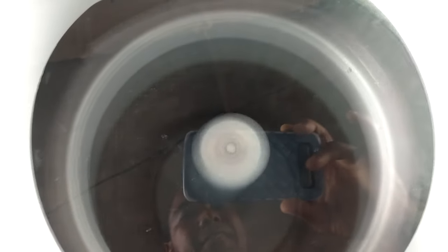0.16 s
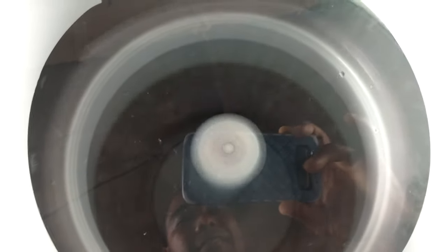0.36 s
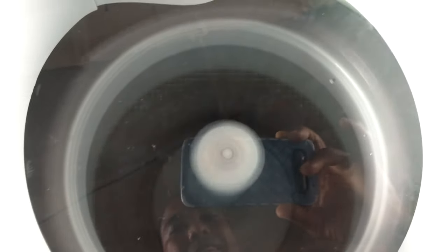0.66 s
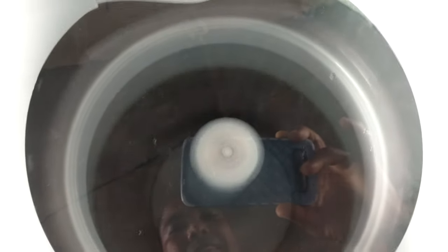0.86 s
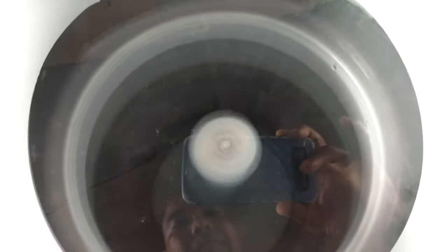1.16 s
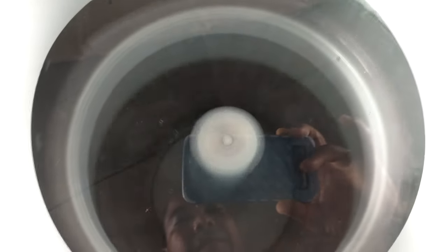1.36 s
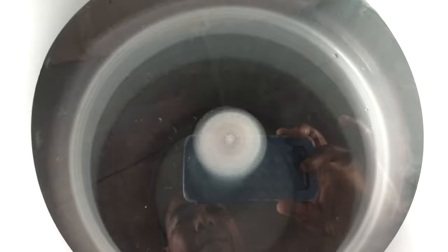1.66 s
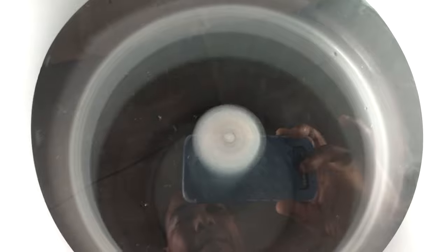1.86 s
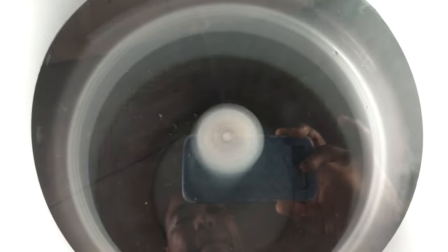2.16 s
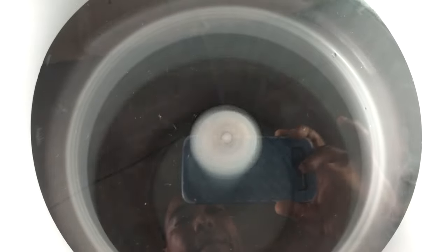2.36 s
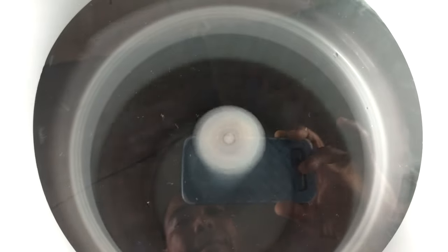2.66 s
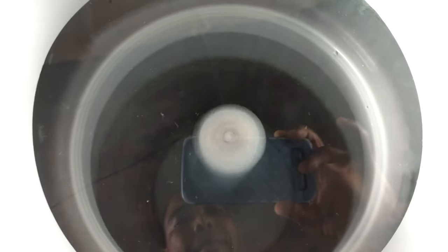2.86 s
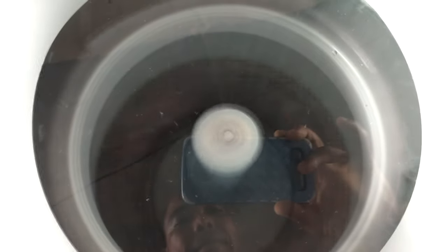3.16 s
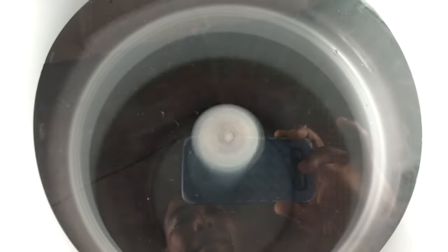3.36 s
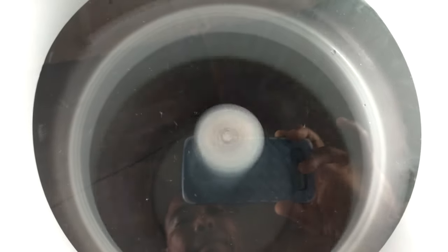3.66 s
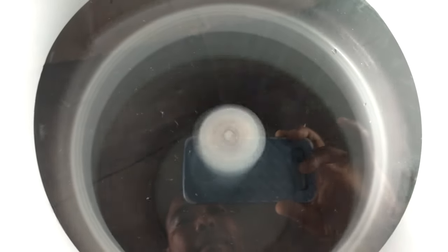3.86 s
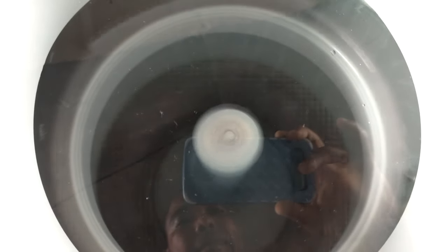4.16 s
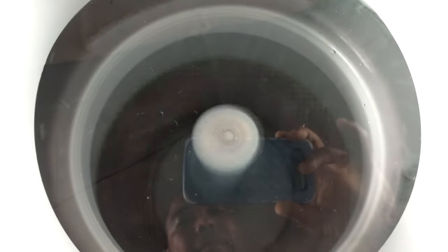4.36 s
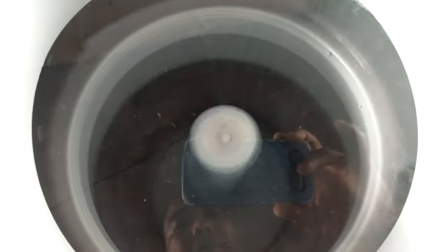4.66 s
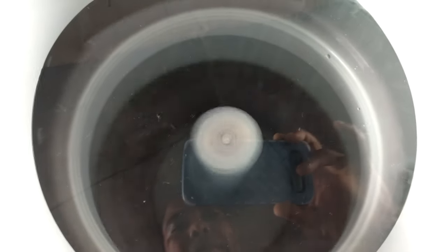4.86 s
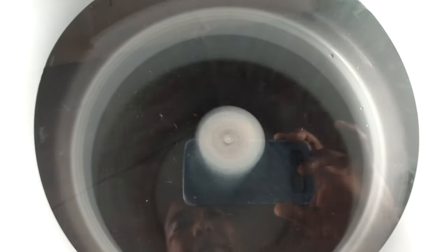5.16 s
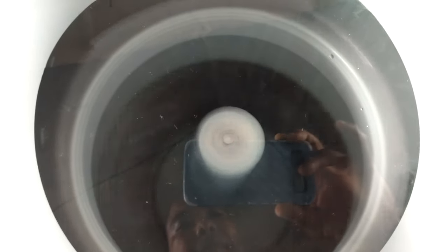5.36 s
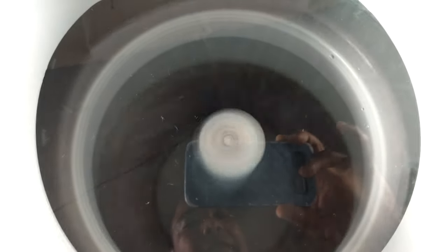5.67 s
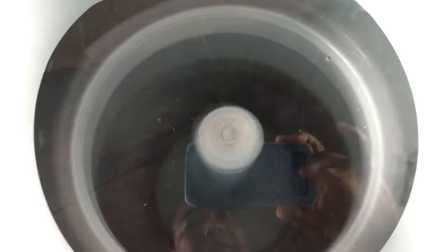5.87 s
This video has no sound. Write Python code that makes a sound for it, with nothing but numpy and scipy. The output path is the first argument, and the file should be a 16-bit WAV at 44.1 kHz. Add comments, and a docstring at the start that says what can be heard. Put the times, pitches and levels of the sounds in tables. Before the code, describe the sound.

In a hard-walled room, a washing machine drum is coasting, heard close up. At 0 s a short rattling jolt and bright fizz settle at once into faint low rumble, airy hiss and 120 Hz hum. Soft hollow knocks follow about twelve a second, strongest near 0.6 s, thinning after 1.1 s and gone by 1.7 s; thin bearing squeaks and tiny crackles on the right accompany them, the squeaks lasting until about 2.2 s. Distant small birds chirp: high falling peeps roughly every half second from 0.3 s, plus quick warbled phrases near 0.35, 1, 1.6, 2.3, 3.5 and 4.8 s. A dry broom-like swish runs 2.8-3.2 s, a shorter one at 4.1-4.4 s, then several quick strokes at 5-5.6 s. At 5.7 s a loud panel-ringing clunk with a thud starts the motor, a weaker rebound follows, and beating tones around 600-750 Hz growl until 6 s.

```python
"""In a hard-walled room a washing machine drum coasts: shaped noise makes rumble, rattle and hiss over mains hum.
Puffs of noise in the drum's modes knock about once a turn, thinning out, among faint squeaks and crackle.
Small birds chirp some way off as gliding sines in a room tail; resonant noise swishes like a broom.
At the end the motor starts: decaying sines and a noise thud clunk, then pairs of wavering tones growl."""
import sys
import numpy as np
from scipy import signal
from scipy.fft import rfft, irfft, next_fast_len
from scipy.io import wavfile
from scipy.ndimage import uniform_filter1d, map_coordinates

SR = 44100
rng = np.random.default_rng(int(sys.argv[2]) if len(sys.argv) > 2 else 0)


def transcribe(signal):
    """Save signal, clipped to [-1, 1], as a 16-bit WAV file at the path in sys.argv[1]."""
    frames = np.atleast_2d(signal).T
    limited = np.clip(frames, -1, 1)
    pcm = np.round(limited * 32767).astype(np.int16)
    wavfile.write(sys.argv[1], SR, pcm)


N = 265614
TIME = np.arange(N) / SR  # seconds

# All levels in the tables are relative; the functions may add make-up gain.
# Stereo likeness of the diffuse noises: pitch_hz, left_right_likeness (1 alike, 0 unrelated, -1 opposed)
ALIKE = [(60, 0.74), (180, 0.93), (550, 0.81), (1650, -0.13), (4970, 0.14), (15000, -0.33)]
# Decay of the room by band: pitch_hz, t60_s
ROOM = [(300, 0.27), (2000, 0.26), (5000, 0.26), (12000, 0.4)]

# Mains hum: pitch_hz, level_db
HUM = (120, -62)
# Low drone under the hum: start_s, level_db
DRONE = [(0, -77), (.9, -75.5), (1.4, -80.5), (2.2, -80), (3.5, -75), (6.02, -77.5)]
# Noise colour of the cabinet's rumble: pitch_hz, level_db (per Hz)
CABINET = [(25, -37), (45, -46), (100, -38), (160, -15.5), (200, -9), (240, -8.5), (280, -15), (322, -1),
           (370, -7.5), (450, -20), (600, -51), (2000, -120)]
# Noise colour of the rattle: pitch_hz, level_db (per Hz)
RATTLE = [(250, -20), (420, -7), (516, -2), (606, -10.5), (767, -5), (901, -11), (1050, -10.5), (1350, -19),
          (1570, -14.5), (2600, -29.5), (3380, -47), (5720, -120)]
# Noise colour of the hiss: pitch_hz, level_db (per Hz)
HISS = [(600, -60), (1200, -15), (2000, -9), (2600, -13), (3800, -11), (5000, -16), (6700, -18), (9400, -7),
        (12500, -14), (13100, -60)]
# Base levels as the drum slows: (dB at the start, dB per second)
CABINET_DB, RATTLE_DB, HISS_DB = (-61.5, -0.66), (-66.5, -0.62), (-74.5, -0.55)
JOLT_DB, JOLT_S = 17.5, 0.051  # extra rattle at the start and its settling time constant
DRIVEN_DB_PER_S = 19.5  # cabinet and rattle swell once the motor pulls
# Squeaks of a bearing: peak_s, level_db
SQUEAKS = [(.04, -68.5), (.31, -75), (.49, -80), (0.649, -63), (.89, -65.5), (1.36, -70.5), (1.61, -68),
           (1.812, -76), (2.14, -65.5), (2.23, -71.5)]
SQUEAK_RISE_DB_PER_S, SQUEAK_FALL_DB_PER_S = 600, 106

# Brief high sounds: peak_s, rise_s, fall_s (time constants), centre_hz, width_hz (of one pass), level_db
GLINTS = [(0, .01, 0.038, 10260, 2190, -49), (.65, .04, .06, 14300, 350, -74)]

# Drum knocks, about one a turn: start_s, low_mode_db, middle_over_low_db, upper_over_low_db
KNOCKS = [(0.009, -55.5, 8, 6), (0.07, -53.5, 5, 5.5), (0.15, -57.5, -1, 8), (0.229, -48, -21, -8),
          (0.31, -59, -7, -12), (0.399, -54.5, 0, -5.5), (0.471, -58, 1, -1), (0.553, -53, -5.5, -2.5),
          (0.63, -42, -9, -7.5), (0.688, -57.5, 6.5, -8), (0.715, -57.5, 4, -5), (0.748, -56.5, 3, -21),
          (0.796, -50, -4.5, -16), (0.878, -48, -14, -8), (0.964, -49, -15, -4), (1.043, -48, -11, -9.5),
          (1.126, -49.5, -1, -18), (1.211, -61, -14, -12), (1.294, -59.5, -12, 1.5), (1.374, -62, -9, -13),
          (1.46, -49.5, -15, -19), (1.63, -60, -11, -13)]
# Low, middle and upper drum mode: pitch_hz, width_hz (of one pass), level_db
DRUM = [(323, 41, -0.5), (542, 122, 2.5), (1040, 110, 2.5)]

# First bird's falling note: length_s, start_hz, end_hz
PEEP = (0.0349, 7200, 6580)
# When the first bird peeps: start_s, level_db
PEEPS = [(0.329, -56.5), (0.826, -53.5), (0.947, -66.5), (1.399, -57), (1.861, -56.5), (2.362, -56),
         (2.863, -53.5), (3.401, -56), (3.898, -55.5), (4.424, -55.5), (4.999, -55), (5.49, -53)]
# A quick drop after some peeps: start_s, start_hz, end_hz, level_db
ZIPS = [(0.878, 7860, 3800, -53.5), (1.923, 5800, 3240, -61.5), (2.44, 7350, 5300, -55.5)]
ZIP_S = 0.0083
# Second bird's phrase: pickup, low rise, high rise, fall, dip, held note, low ending;
# after_s (from the start of the rise), length_s, start_hz, end_hz (None is the phrase's peak pitch)
PHRASE = [(-.016, .022, 6350, 6350), (0, .015, 3950, 4640), (.006, 0.015, 4850, None),
          (0.017, 0.032, None, 3300), (.04, .028, 3500, 3580), (.07, .026, 3780, 3983),
          (.1, .024, 3080, 3080)]
# When the second bird sings: start_s, peak_hz, then level_db of each of the seven notes
PHRASES = [(.349, 5505, -72, -53, -51.5, -58, -53, -47, -74),
           (.973, 4596, -89, -48.5, -61, -50, -65, -77, -83),
           (1.608, 5390, -69, -55, -53.5, -77, -56.5, -46, -76),
           (2.328, 5200, -85, -87, -80, -60, -59, -68, -66),
           (3.496, 5490, -59, -51, -52.5, -63, -58.5, -51.5, -68),
           (4.838, 5710, -67.5, -61, -58, -57, -60, -52, -65.5)]
# Single short notes: start_s, pitch_hz (centre of the glide), level_db
CHIPS = [(0.205, 4800, -72.5), (.33, 7830, -66), (.69, 5000, -76.5), (1.045, 3100, -66),
         (1.79, 5260, -63.5), (2.276, 2520, -71), (2.977, 4050, -48.5), (3.336, 1530, -72.5),
         (4.452, 2256, -69.5), (5.335, 4030, -47.5), (5.435, 4000, -46.5)]
CHIP_S = 0.023

# One curve a stroke of the swishing: start_s, level_db, treble_over_level_db, rings_over_level_db
SWISHES = [
    [(2.77, -80, -11, 2), (2.795, -60, -16, -6), (2.806, -45.5, -18, -5), (2.876, -53, -22, -8.5),
     (2.908, -50, -11.5, 2.5), (2.986, -47.5, 1, -4.5), (3.106, -47.5, -2.5, 1.5), (3.156, -49, -6, -4.5),
     (3.3, -92, -6, -7)],
    [(4.02, -75, -5, -4), (4.094, -59, 8.5, 1), (4.154, -65, 6.5, -2), (4.2, -65, 2, 2)],
    [(4.14, -77, -2, -16), (4.18, -59.5, 0, 1), (4.21, -49, 0.5, 3.5), (4.276, -46, -5.5, -5.5),
     (4.372, -54, -14, -2.5), (4.41, -59.5, -4, -18), (4.55, -85, -2, -2)],
    [(4.97, -83, -11, -6), (4.998, -60, -9, 0), (5.06, -73.5, -21, -1), (5.096, -63, -26, 5),
     (5.15, -85.5, -16, 8)],
    [(5.15, -68.5, -16, -1), (5.19, -69.5, -17, 5), (5.2, -56.5, -17, -5), (5.235, -51.5, -24, 2),
     (5.252, -54, -27, 1.5), (5.3, -67, -8, -9)],
    [(5.3, -69.5, -24, 3), (5.336, -45.5, -5.5, -10), (5.388, -51, 2, -1.5), (5.44, -46, 7, 3.5),
     (5.526, -55, -3, -7), (5.64, -85, -10, -6)],
]
# Colour of each stroke over its level: upper_group_db, top_treble_db, low_ring_db, middle_ring_db,
# high_ring_db, left_minus_right_db
STROKES = [(-2, -6, -23, -11, -5, -0.82), (-4.5, 8, -25, -24, -16, -1.5), (-3, -5, -8.5, -21.5, -11.5, .5),
           (5, -11, -7, -9.5, -3.5, -0.5), (2.5, -7, -3, -8, 0, 1), (-4, -17, -24, -15, -13.5, -0.5)]
# Resonances of the fine contacts, a lower and an upper group: pitch_hz, width_hz, level_db
BRISTLES = [
    [(3110, 1040, -6), (3820, 860, -2), (4570, 770, -4.5)],
    [(5580, 390, 12.5), (6760, 3600, 2.5)],
]
# Low, middle and high hollow ring: pitch_hz, width_hz, level_db (of one pass, applied twice)
HOLLOW = [
    [(1126, 70, 1)],
    [(1550, 98, -6.5), (2013, 140, 0.5)],
    [(2648, 73, 2)],
]

# The motor's clunk and its rebound: start_s, ring_db, thud_db
CLUNKS = [(5.688, -28, -25.5), (5.785, -44, -57)]
# Panels that ring: pitch_hz, level_db, t60_s
PANELS = [(313, -14, 0.25), (486, -14, 0.23), (642, 6.5, 0.13), (740, 3, 0.2), (763, -9, .15),
          (855, -24, .15), (920, -3.5, 0.12), (1010, -20, 0.098), (1134, 10, 0.053), (1217, -1, 0.099),
          (1800, -14.5, 0.092)]
# Noise colour of the thud: pitch_hz, level_db (per Hz)
THUD = [(150, -54), (250, -17.5), (550, -19.5), (631, -1), (1130, -1.5), (1460, -16), (2300, -18),
        (2800, -30), (3400, -21), (3850, -37), (4300, -27.5), (5600, -44), (8970, -47), (11600, -36),
        (15000, -80)]
# Course of the growl: start_s, growl_db, upper_over_lower_pair_db
MOTOR = [(5.673, -48, -3.5), (5.689, -45.5, 13), (5.742, -44.5, -1.5), (5.8, -45, 3), (5.86, -44.5, 3),
         (5.94, -48, -2), (6.02, -42.5, -12)]
# Lower and upper pair of winding tones: pitch_hz, level_db
WINDINGS = [
    [(601, 0), (646, -7)],
    [(703, 2), (757, -11)],
]

TOP_HZ = 15750  # nothing sounds from here up


def amp(db):
    """Gain of a level in dB."""
    return 10 ** (np.asarray(db) / 20)


def unit(x):
    """x at rms 1."""
    return x / np.sqrt(np.mean(x ** 2) + 1e-20)


def along(points, hz):
    """(Hz, value) points read on a log frequency axis."""
    f, value = np.transpose(points)
    return np.interp(np.log(hz + 1), np.log(f + 1), value)


def wobble(rate):
    """A smooth random curve, rate knots a second."""
    knots = rng.standard_normal(int(N * rate / SR) + 4)
    return map_coordinates(knots, [np.arange(N) * rate / SR])


def filtered(x, response):
    """x shaped by a response that is a function of frequency in Hz."""
    m = next_fast_len(x.shape[-1] + 8192)
    spectrum = rfft(x, m) * response(np.fft.rfftfreq(m, 1 / SR))
    return irfft(spectrum, m)[..., :x.shape[-1]]


def coloured(points):
    """Response drawn through (Hz, dB) points."""
    return lambda hz: amp(along(points, hz))


def resonances(modes):
    """Response of (Hz, width, dB) resonances side by side, with alternating signs."""
    def response(f):
        total = 0
        for k, (centre, width, db) in enumerate(modes):
            peak = 1j * f * width / (centre * centre - f * f + 1j * f * width)
            total = total + (-1) ** k * amp(db) * peak
        return total
    return response


def twice(modes):
    """Resonances applied twice, for steep skirts."""
    return lambda hz: resonances(modes)(hz) ** 2


def band(lo, hi):
    """Smooth band-pass response from lo to hi Hz with steep edges."""
    return lambda hz: 1 / np.sqrt((1 + (lo / (hz + 1)) ** 12) * (1 + (hz / hi) ** 12))


def diffuse(gain):
    """Stereo noise of rms 1; the share of mid and side sets how alike left and right are by frequency."""
    def mid_side(hz):
        turn = np.arccos(np.clip(along(ALIKE, hz), -1, 1)) / 2
        return gain(hz) * [np.cos(turn), np.sin(turn)]
    mid, side = filtered(rng.standard_normal((2, N)), mid_side)
    return unit(np.array([mid + side, mid - side]))


def patches(x, patchy_db):
    """Random gain in patches of time and frequency."""
    z = signal.stft(x, nperseg=256)[2]
    field = uniform_filter1d(rng.standard_normal(z.shape), size=3, axis=1)
    field = uniform_filter1d(field, size=8, axis=2)
    gain = amp(patchy_db * unit(field) - patchy_db ** 2 / 9)
    return signal.istft(z * gain, nperseg=256)[1][:, :N]


def in_room(x, direct_db, rise, lumpy_db):
    """Direct sound plus a fresh random tail that builds up and dies by band, with lumps of echo."""
    hz, t, z = signal.stft(rng.standard_normal((2, SR // 2)), SR, nperseg=256)
    echoes = uniform_filter1d(rng.standard_normal(z.shape), size=5, axis=1)
    decay_db = -60 * t / along(ROOM, hz)[:, None]
    tail = signal.istft(z * amp(lumpy_db * unit(echoes) + decay_db), SR, nperseg=256)[1]
    tail = tail * (1 - np.exp(-np.arange(tail.shape[1]) / SR / rise))
    tail = tail / np.linalg.norm(tail[0])
    tail[:, 0] = amp(direct_db)
    return signal.fftconvolve(x[None], tail, axes=1)


def add(track, s, x):
    """Mixes x into track from time s on."""
    part = track[:, round(s * SR):][:, :x.shape[-1]]
    part += x[..., :part.shape[1]]


def hum_and_drone():
    """Mains hum is one slightly wavering sine; the drone is noise through a low resonance."""
    hz, db = HUM
    hum = amp(db + 1 + 0.41 * wobble(2)) * np.sin(2 * np.pi * hz * TIME)
    drone_db = np.interp(TIME, *np.transpose(DRONE)) + 6.0
    return hum + amp(drone_db) * diffuse(twice([(83.0, 63, 0)]))


def cabinet_and_rattle():
    """Rumble and rattle are unsteady noise that fades as the drum slows and swells as the motor pulls."""
    cabinet_db, rattle_db = [db + slope * TIME for db, slope in (CABINET_DB, RATTLE_DB)]
    driven_db = DRIVEN_DB_PER_S * np.clip(TIME - MOTOR[0][0], 0, None)
    cabinet = amp(cabinet_db + driven_db + 0.6 * wobble(21)) * diffuse(coloured(CABINET))
    jolt_db = JOLT_DB * np.exp(-TIME / JOLT_S)
    rattle = amp(rattle_db + driven_db + jolt_db + 2.1 * wobble(30)) * diffuse(coloured(RATTLE))
    return cabinet + rattle


def squeaks():
    """A bearing squeaks: narrow noise that rises fast and falls more slowly, with a shaky level."""
    swell = 0
    for s, db in SQUEAKS:
        drop_db = np.maximum(SQUEAK_RISE_DB_PER_S * (s - TIME), SQUEAK_FALL_DB_PER_S * (TIME - s))
        swell = swell + amp(db - drop_db)
    return swell * amp(1.7 * wobble(30.03)) * diffuse(twice([(1822, 81, 0)]))


def hiss():
    """Faintly patchy broad noise that fades as the drum slows."""
    db, slope = HISS_DB
    return patches(amp(db + slope * TIME) * diffuse(coloured(HISS)), patchy_db=0.5)


def glints():
    """A bright fizz dying away at the start and a thin high whine, both resonant noise."""
    out = 0
    for s, rise, fall, hz, width, db in GLINTS:
        swell = np.exp(-np.maximum((s - TIME) / rise, (TIME - s) / fall))
        out = out + amp(db) * swell * diffuse(twice([(hz, width, 0)]))
    return out


def ticks(count=260):
    """Faint high crackle in the first second, on the right: tiny wavering sines that swell and die fast."""
    out, t = np.zeros((2, N)), np.arange(SR // 16) / SR
    for when, pitch, size, pan in rng.random((count, 4)):
        wavering = np.cumsum(rng.normal(0, 0.089, len(t)))
        tone = np.sin(2 * np.pi * (7500 + 7000 * pitch) * t + wavering)
        ring = amp(-60 * t / 0.035) * tone * (1 - np.exp(-t / 0.0055))
        size_db = -5.3 * np.log(1 - .97 * size)  # a few ticks stand out
        pan_db = np.array([[6], [-6]]) * (pan - 2.67)
        add(out, when ** 1.1, amp(-82 + size_db + pan_db) * ring)
    return out


def knocks():
    """About once a turn the drum brushes its tub: a short puff of contact noise in each mode."""
    out, t = np.zeros((2, N)), np.arange(SR // 8) / SR
    puff = t / .004 * np.exp(1 - t / 0.0033)
    for s, db, *over_low in KNOCKS:
        for mode, level in zip(DRUM, [0, *over_low]):
            shared, separate = rng.standard_normal(len(t)), rng.standard_normal((2, len(t)))
            ring = filtered(puff * (shared + 0.57 * separate), twice([mode]))
            add(out, s, amp(db + level + mode[2]) * ring / np.abs(ring).max())
    return out


def bird_notes():
    """Every note of the birds as (start s, length s, start Hz, end Hz, level dB)."""
    notes = [(s, *PEEP, db) for s, db in PEEPS]
    notes += [(s, ZIP_S, *drop) for s, *drop in ZIPS]
    for s, peak_hz, *levels in PHRASES:
        for (after, length, hz0, hz1), db in zip(PHRASE, levels):
            notes.append((s + after, length, hz0 or peak_hz, hz1 or peak_hz, db))
    return notes + [(s, CHIP_S, 1.04 * hz, .96 * hz, db) for s, hz, db in CHIPS]


def birds():
    """Each note is a short gliding whistle with a rough flutter, heard mostly through the room."""
    out = np.zeros((2, N))
    for s, length, hz0, hz1, db in bird_notes():
        u = np.linspace(0, 1, round(length * SR))
        flutter = np.interp(u * length * 260, np.arange(40), rng.standard_normal(40))
        pitch = (hz0 + (hz1 - hz0) * u) * (1 + 0.016 * flutter)
        swell = np.sqrt(np.abs(np.sin(np.pi * u)))
        whistle = swell * np.sin(2 * np.pi * np.cumsum(pitch) / SR)
        heard = in_room(whistle, direct_db=-16, rise=.003, lumpy_db=5)
        add(out, s - .003, amp(db + 10.5) * heard)  # early by the room's build-up
    return out


def swishes():
    """Many fine contacts hiss through a few resonances; strokes differ in brightness and hollow ring."""
    lower, upper = [lambda hz, g=g: resonances(g)(hz) * band(2300, 8000)(hz) for g in BRISTLES]
    treble = diffuse(band(7900, 10900))
    layers = [diffuse(g) for g in (lower, upper, band(18000, 18200), *map(twice, HOLLOW))]
    grain = amp(0.99 * wobble(24.916) + 0.8 * np.array([wobble(500), wobble(500)]))
    out = np.zeros((2, N))
    for stroke, (*colour, pan_db) in zip(SWISHES, STROKES):
        s, db, treble_db, rings_db = np.transpose(stroke)
        level_db = np.interp(TIME, s, db) + pan_db * np.array([[.5], [-.5]])
        gate = ((TIME >= s[0]) & (TIME < s[-1])) * amp(level_db)
        body, high, top, *rings = [amp(c) * x for c, x in zip([0, *colour], layers)]
        bright = amp(np.interp(TIME, s, treble_db)) * treble
        hollow = amp(np.interp(TIME, s, rings_db)) * sum(rings)
        out += gate * (body + high + top + bright + hollow)
    return patches(out * grain * amp(1.5), patchy_db=3.5)


def clunks():
    """The motor is switched on: a clunk and a weaker rebound ring the panels over a noise thud."""
    out, t = np.zeros((2, N)), np.arange(SR // 2) / SR
    for s, ring_db, thud_db in CLUNKS:
        ring = 0
        for hz, db, t60 in PANELS:
            fading = amp(db + rng.normal(0, 4.4, (2, 1)) - 60 * t / t60)  # uneven left and right
            ring = ring + fading * np.sin(2 * np.pi * (hz * t + rng.random()))
        add(out, s, amp(ring_db) * ring * (1 - np.exp(-(t / 0.01) ** 2)))
        puff = unit(filtered(rng.standard_normal(len(t)), coloured(THUD)))
        puff = puff * amp(-60 * t / 0.16) * (1 - np.exp(-t / 0.016))
        thud = in_room(puff, direct_db=5.5, rise=0.0092, lumpy_db=0)
        add(out, s, amp(thud_db) * amp([[-2.5], [2.5]]) * thud)
    return out


def winding_pair(pair):
    """Two close tones, wavering in phase and level, that beat against each other."""
    total = 0
    for hz, db in pair:
        level = amp(db + 3.5 * wobble(12))
        phase = 1.3 * wobble(30) + .5 * rng.standard_normal((2, 1))
        total = total + level * np.sin(2 * np.pi * hz * TIME + phase)
    return total


def growl():
    """The motor's windings hum on as two pairs of beating tones, a little to the left."""
    s, db, upper_db = np.transpose(MOTOR)
    lower, upper = [winding_pair(pair) for pair in WINDINGS]
    tones = lower + amp(np.interp(TIME, s, upper_db)) * upper
    onset = np.clip((TIME - s[0] + 0.0064) / 0.0091, 0, 1) ** 2
    return onset * amp(np.interp(TIME, s, db) - 2.0) * tones * amp([[1.5], [-1.5]])


def scene():
    """All sources mixed in stereo."""
    machine = hum_and_drone() + cabinet_and_rattle() + squeaks() + hiss()
    return machine + glints() + ticks() + knocks() + birds() + swishes() + clunks() + growl()


def record(dry):
    """Cuts everything from TOP_HZ up with a sharp edge."""
    return filtered(dry, lambda hz: hz < TOP_HZ)


dry = scene()
out = record(dry)
transcribe(out)
```